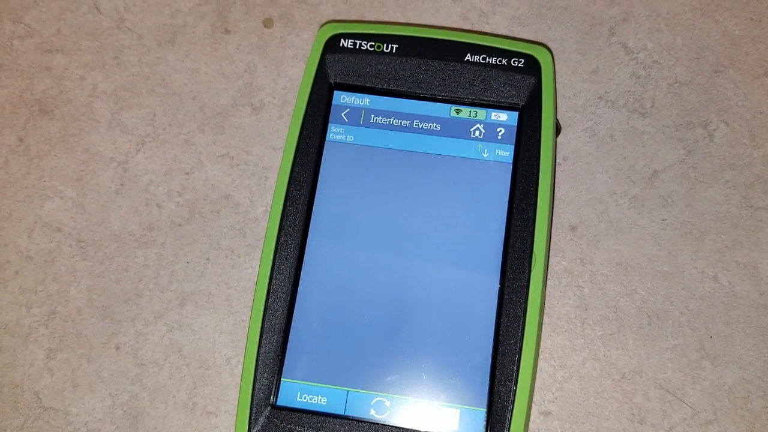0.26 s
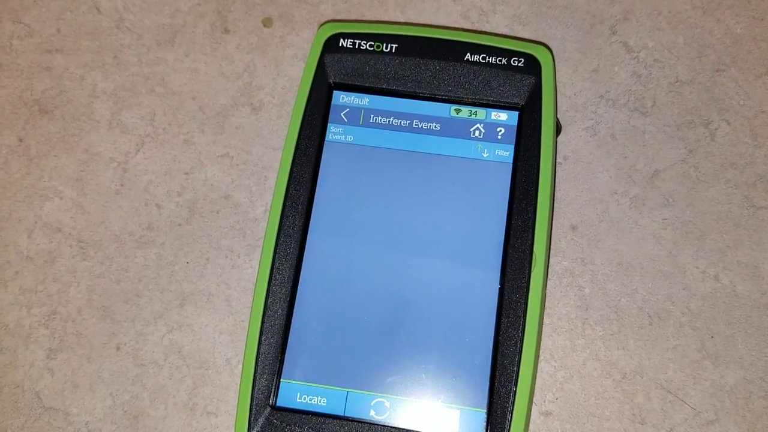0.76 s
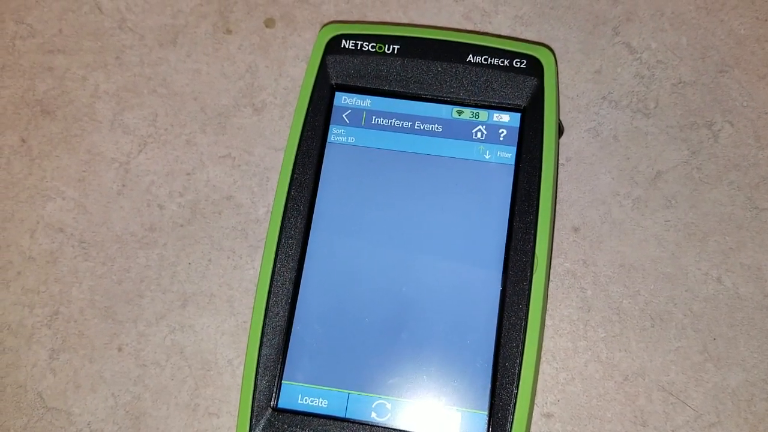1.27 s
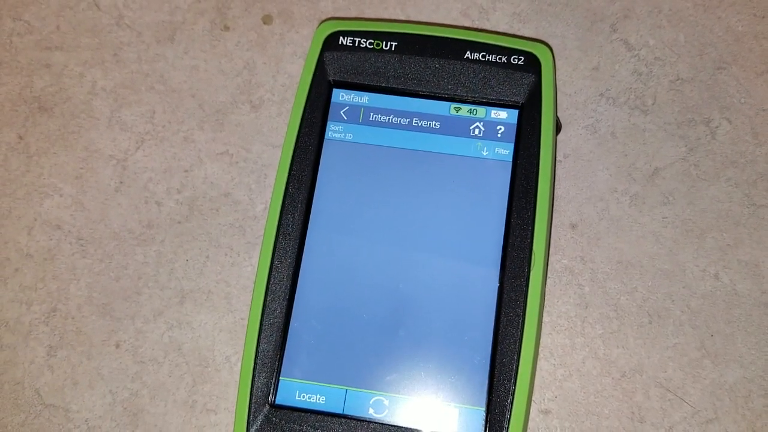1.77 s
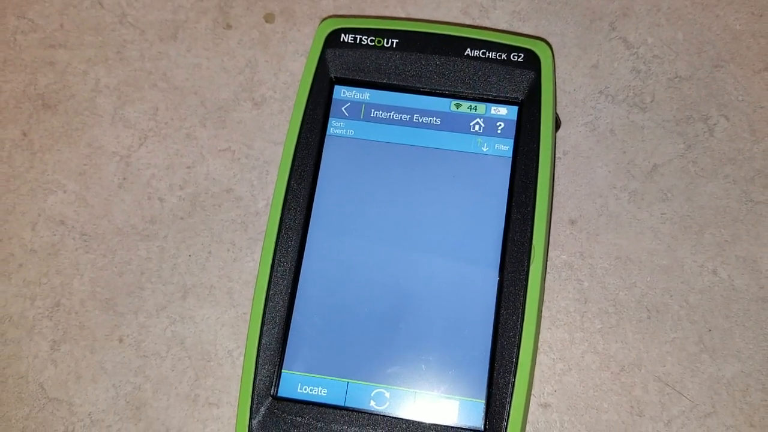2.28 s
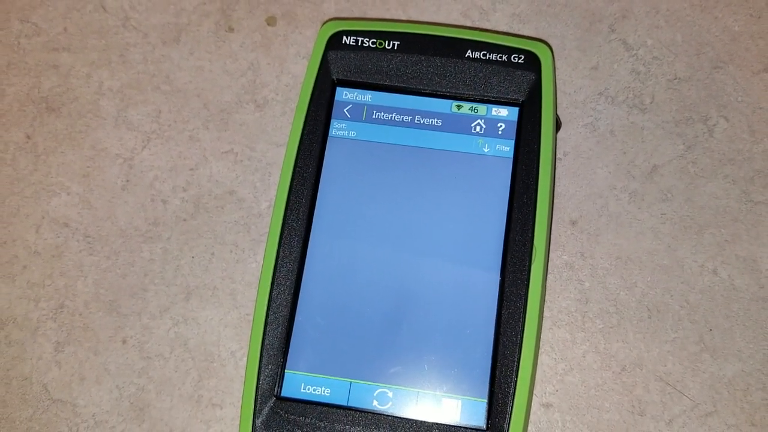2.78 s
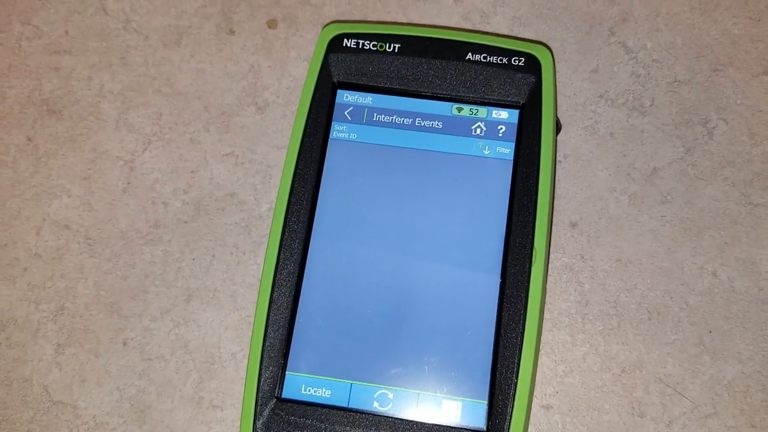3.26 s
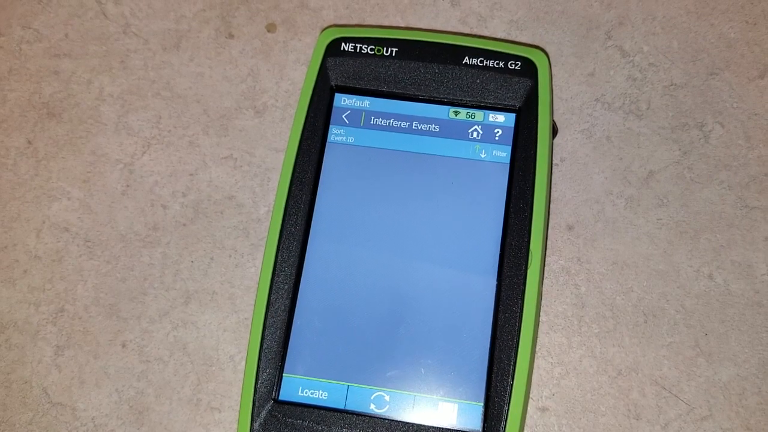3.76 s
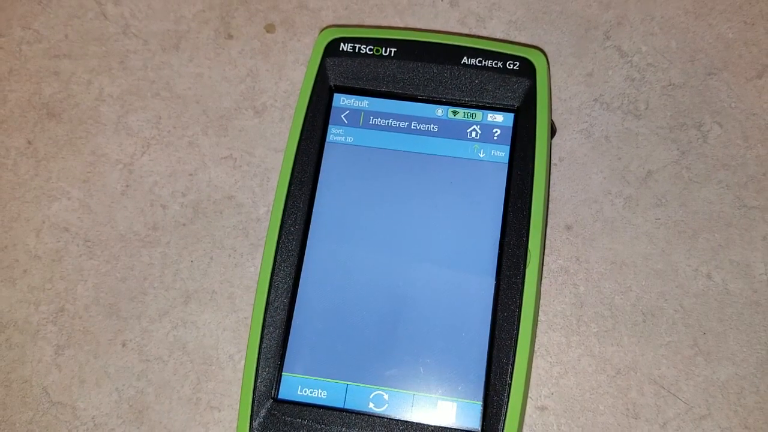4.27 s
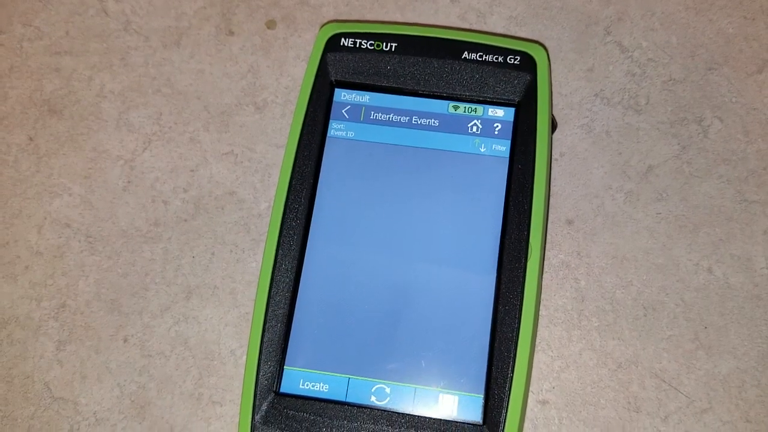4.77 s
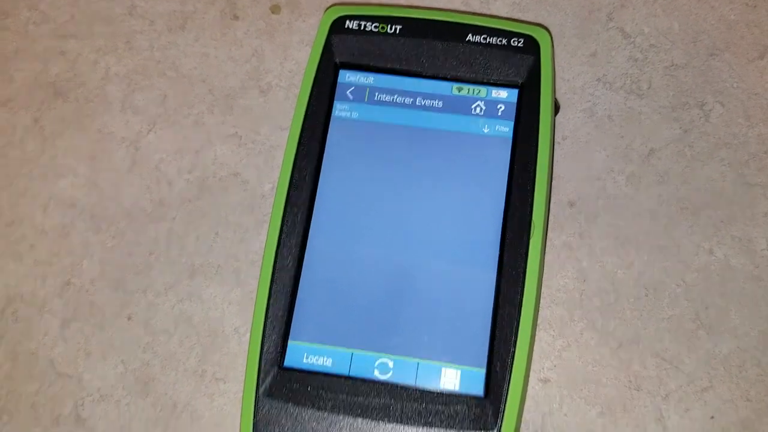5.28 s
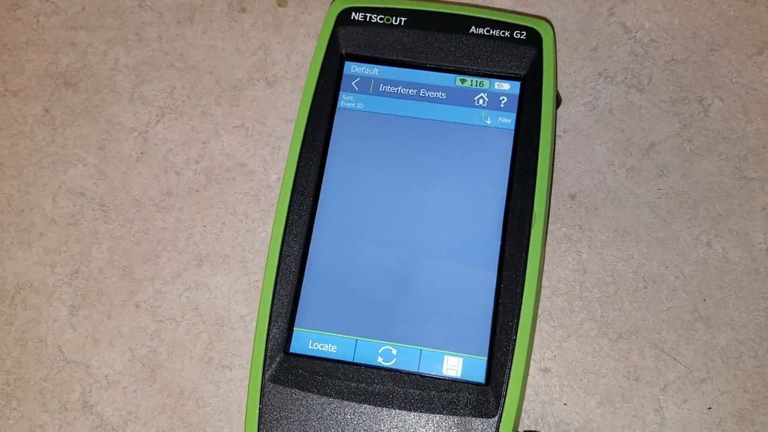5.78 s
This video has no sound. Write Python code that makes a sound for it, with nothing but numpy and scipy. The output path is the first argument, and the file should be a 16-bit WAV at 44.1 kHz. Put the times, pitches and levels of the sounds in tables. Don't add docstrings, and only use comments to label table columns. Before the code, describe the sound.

Two microwave ovens hum steadily together in a small hard room; near the end fingers tick on a plastic case, which snaps once sharply.

```python
import sys
import numpy as np
from scipy import signal
from scipy.fft import rfft, irfft, next_fast_len
from scipy.io import wavfile
from scipy.ndimage import uniform_filter1d

SR = 44100
rng = np.random.default_rng(int(sys.argv[2]) if len(sys.argv) > 2 else 0)


def convert_level_to_amplitude(level_db):
    exponent = np.asarray(level_db, float) / 20
    return 10 ** exponent


def pcm_store(signal):
    levels = np.round(np.clip(np.atleast_2d(signal), -1, 1) * 32767)
    wavfile.write(sys.argv[1], SR, levels.astype(np.int16).T)


N = 266275
TIME = np.arange(N) / SR


def along(table, hz):
    at, value = np.transpose(table)
    return np.interp(np.log(np.maximum(hz, 1)), np.log(at), value)


def sides(pan_db):
    gain = convert_level_to_amplitude(np.array([[pan_db], [-pan_db]]) / 2)
    return gain / np.sqrt(np.mean(gain ** 2))


def smooth(x, first, second):
    return uniform_filter1d(uniform_filter1d(x, first), second)


def walk(rate):
    hold = int(SR / rate)
    steps = np.repeat(rng.standard_normal(N // hold + 1), hold)
    return 1.3 * smooth(steps, hold, hold)[:N]


def band_pass(order, edges_hz):
    return signal.butter(order, edges_hz, "band", fs=SR, output="sos")


def decay(t, t60):
    return np.exp(-np.log(1000) * t / t60)


# frequency in Hz, level in dB per Hz.
AIR = [(20, -89.5), (40, -81.5), (70, -76.5), (100, -67.5), (170, -67), (215, -73.5), (250, -72),
       (300, -68), (350, -68.5), (385, -73.5), (480, -73.5), (560, -72.5), (700, -70), (900, -78.5)]
# frequency in Hz, level in dB per Hz.
HISS = [(900, -79), (1400, -81.5), (2200, -86), (3000, -89.5), (3900, -90.5), (5100, -97.5), (6500, -100.5),
        (7900, -103), (8600, -107.5), (10700, -106.5), (11400, -104.5), (12800, -105.5), (14200, -104.5),
        (15700, -106.5)]
# frequency in Hz, left minus right in dB.
SIDES = [(130, 0), (185, 2.5), (310, -2.5), (400, -2), (460, 2), (700, 2), (1200, -2), (4400, 0),
         (5800, -4.5), (7200, 0), (8600, 7), (12300, 1), (14200, 5), (14900, 16)]
# frequency in Hz, share common to both from 0 to 1.
ALIKE = [(25, .985), (60, .995), (200, 0.99), (400, 0.72), (750, 0.82), (1000, 0.26), (2000, 0.02),
         (6000, 0.03)]
# centre in Hz, width in Hz, height in dB (dips below zero).
VENTS = [(198, 14, 4), (222, 12, -4), (258, 12, -5), (272, 12, 4), (296, 10, 3), (350, 12, 4), (398, 14, 4),
         (418, 14, -3), (468, 18, 5), (492, 12, -5), (560, 10, -4), (720, 16, 3), (858, 30, 3),
         (1440, 120, 2), (1980, 150, 2)]
PORT_LAG_S = 0.00029
SHADE_FROM_S, SHADE_TO_S, SHADE_DB, COVER_S, UNCOVER_S = 5.29, 5.93, -4, .07, .02


def air():
    size = next_fast_len(N)
    hz = np.arange(size // 2 + 1) * SR / size
    common, left, right = rfft(rng.standard_normal((3, size)))
    alike = np.clip(along(ALIKE, hz), 0, 1)
    lag = np.exp(1j * np.pi * hz * PORT_LAG_S)
    ports = np.sqrt(alike) * common * np.array([lag, 1 / lag])
    ports += np.sqrt(1 - alike) * np.array([left, right])
    balance_db = np.outer([.5, -.5], along(SIDES, hz))
    ports *= np.sqrt(SR / 2) * convert_level_to_amplitude(along(AIR + HISS[1:], hz) + balance_db)
    ports *= convert_level_to_amplitude(sum(db / (1 + (2 * (hz - at) / width) ** 2) for at, width, db in VENTS))
    ripple = smooth(rng.standard_normal(ports.shape), 400, 200)
    ports *= convert_level_to_amplitude(45.0 * np.minimum(hz / 1500, 1) * ripple)

    out, swell, octave = 0, walk(0.81), np.log2(np.maximum(hz, 1))
    for centre in np.arange(4, 15):
        band = np.cos(np.pi / 2 * np.clip(octave - centre, -1, 1)) ** 2
        level = convert_level_to_amplitude(0.15 * swell + 0.27 * walk(5.1))
        out = out + level * irfft(ports * band, size)[:, :N]

    covering = (TIME - SHADE_FROM_S) / COVER_S
    uncovering = (SHADE_TO_S - TIME) / UNCOVER_S
    shade = SHADE_DB * np.clip(np.minimum(covering, uncovering), 0, 1)
    treble = signal.sosfiltfilt(band_pass(3, [7800, 13200]), out)
    return out + (convert_level_to_amplitude(shade) - 1) * treble


ROOM_DB, ROOM_T60_S = -17, 0.08


def room(x):
    t = TIME[:6000]
    walls = rng.standard_normal((2, len(t))) * decay(t, ROOM_T60_S) * (t > .002)
    tail = signal.fftconvolve(x.mean(axis=0)[None], walls, axes=1)[:, :N]
    return x + convert_level_to_amplitude(ROOM_DB) * tail / 10


def tick(s, hz, width_hz, db, pan_db, ring):
    out, t = np.zeros((2, N)), TIME[:600]
    noise = rng.standard_normal((2, len(t)))
    edges = np.clip([hz - width_hz / 2, hz + width_hz / 2], 900, .45 * SR)
    release = 9 * (t == 0)
    burst = (noise[0] + .8 * noise + release) * decay(t, ring)
    burst = signal.sosfilt(band_pass(3, edges), burst)
    start = int(s * SR)
    out[:, start:start + len(t)] = convert_level_to_amplitude(db) * sides(pan_db) * burst / np.abs(burst).max()
    return out


BODY_WIDTH = 0.72
SHELL_HZ, SHELL_WIDTH_HZ, EDGE_HZ, EDGE_WIDTH_HZ = 6500, 4400, 12200, 8400


def hand(table, pan_db, ring):
    out = 0
    for s, hz, body_db, shell_db, edge_db in table:
        out = out + tick(s, hz, BODY_WIDTH * hz, body_db, pan_db, ring)
        out = out + tick(s, SHELL_HZ, SHELL_WIDTH_HZ, shell_db, pan_db, ring)
        out = out + tick(s, EDGE_HZ, EDGE_WIDTH_HZ, edge_db, pan_db, ring)
    return out


# start in seconds, body pitch in Hz, body, shell and edge levels in dB.
LEFT_TICKS = [
    (5.1998, 1750, -25, -30.5, -37),
    (5.229, 3500, -30, -34, -34),
    (5.2592, 2900, -30, -25.5, -30),
    (5.2823, 1700, -34, -37, -55),
]
# start in seconds, peak level in dB, centre in Hz.
CRACKLE = [
    (5.218, -48, 7000),
    (5.2215, -44, 7500),
    (5.238, -42, 6500),
    (5.2405, -43, 13000),
    (5.247, -45, 13000),
    (5.2545, -44, 8000),
    (5.2555, -43, 13000),
    (5.2572, -43, 13000),
    (5.267, -48, 12000),
]
LEFT_PAN_DB, LEFT_RING_S, CRACKLE_WIDTH_HZ = 25, 0.0033, 3700


def left_hand():
    out = hand(LEFT_TICKS, LEFT_PAN_DB, LEFT_RING_S)
    for s, db, hz in CRACKLE:
        out = out + tick(s, hz, CRACKLE_WIDTH_HZ, db, LEFT_PAN_DB, LEFT_RING_S)
    return out


# start in seconds, body pitch in Hz, body, shell and edge levels in dB.
RIGHT_TICKS = [
    (5.9312, 3500, -31.5, -30, -36),
    (5.9454, 4670, -22, -29, -34),
    (5.966, 9000, -60, -60, -44),
]
RIGHT_PAN_DB, RIGHT_RING_S = -8.5, 0.0046


def right_hand():
    return hand(RIGHT_TICKS, RIGHT_PAN_DB, RIGHT_RING_S)


KNOCK_S, KNOCK_HZ, KNOCK_WIDTH_HZ, KNOCK_DB, KNOCK_RING_S, KNOCK_EDGE_DB = 6.0014, 3600, 2000, -21, 0.016, -42


def knock():
    hollow = tick(KNOCK_S, KNOCK_HZ, KNOCK_WIDTH_HZ, KNOCK_DB, RIGHT_PAN_DB, KNOCK_RING_S)
    return hollow + tick(KNOCK_S, EDGE_HZ, EDGE_WIDTH_HZ, KNOCK_EDGE_DB, RIGHT_PAN_DB, KNOCK_RING_S)


# start in seconds, strength in dB, length of push in seconds.
SNAP = [
    (5.9925, -30, .0006),
    (5.9953, -23, .0006),
    (5.9977, -27, .0015),
    (5.9995, -18, .0008),
    (6.0007, -19, 0.00043),
    (6.002, -4.5, 0.00093),
    (6.005, -20, .001),
    (6.0072, -27, 0.0012),
    (6.0095, -24, .0008),
]
# frequency in Hz, level in dB, 60 dB decay time in seconds.
SNAP_MODES = [
    (3050, -11.5, 0.013),
    (3700, -19, 0.0088),
    (4420, -11.5, 0.008),
    (5790, -1, 0.0064),
    (6160, -25, 0.029),
    (6900, -10, .006),
]
SNAP_DB, SNAP_PAN_DB = -12, -13


def snap():
    force, t = np.zeros(N), TIME[:200]
    main_mode = np.sin(2 * np.pi * SNAP_MODES[3][0] * t)
    for s, db, push in SNAP:
        shape = np.sin(np.pi * np.clip(t / push, 0, 1))
        rough = main_mode + .7 * rng.standard_normal(len(t))
        start = int(s * SR)
        force[start:start + len(t)] += convert_level_to_amplitude(db) * shape * rough
    t = TIME[:4000]
    body = sum(convert_level_to_amplitude(db) * np.sin(2 * np.pi * hz * t) * decay(t, t60) for hz, db, t60 in SNAP_MODES)
    ring = signal.fftconvolve(force, body)[:N]
    ring = signal.sosfilt(band_pass(8, [2500, 7400]), ring)
    ring *= convert_level_to_amplitude(SNAP_DB) / np.abs(ring).max()
    return sides(SNAP_PAN_DB) * ring


def tones(table, turns, waver_db, wander):
    out = np.zeros((2, N))
    for multiple, db, pan_db, lead in table:
        phase = 2 * np.pi * (multiple * turns + rng.random()) + wander * walk(3.07)
        size = np.sqrt(2) * convert_level_to_amplitude(db + waver_db * walk(4.95))
        wave = np.sin(phase + np.array([[lead], [-lead]]) / 2)
        out += size * sides(np.clip(pan_db, -14, 14)) * wave
    return out


# frequency in Hz, level in dB, left minus right in dB, left lead in radians.
DRONES = [(158.5, -55.1, -0.7, 0.32), (196.8, -59.8, 1.1, 0.25), (269.2, -62.1, 2.0, 0.22),
          (402.7, -61.0, -15.8, 0.03), (522.7, -60.6, -2.9, 0.01), (546.4, -56.7, 1.0, -1.24),
          (619.0, -57.3, -5.3, -0.03), (642.7, -63.2, -29.8, -1.06), (666.4, -49.9, 8.7, 0.2),
          (235.2, -57, -1, 1), (331.4, -51, -0.88, -0.21)]


def motors():
    return tones(DRONES, TIME, waver_db=1.3, wander=.45)


# multiple of shaft speed, level in dB, left minus right in dB, left lead in radians.
BLOWER = [(1, -68.7, 0.1, 0.01), (3, -58.8, 1.3, 0.02), (6, -36.4, -0.1, 0.28), (9, -62.8, -5.4, 0.7),
          (12, -51.4, -5.0, 0.58), (18, -61.9, 6.8, 1.24), (24, -63.8, 2.1, -0.23), (30, -60.7, 0.9, 1.81),
          (36, -68.8, 7.1, 2.81)]
# multiple of shaft speed, level in dB, left minus right in dB, left lead in radians.
COOLER = [(1, -75, 13, 6), (2, -53, 0, 0.33), (4, -58.5, -5, -3), (6, -49, 0, 0.82), (12, -66.5, -19, 0.5)]
# time in seconds, blower speed in Hz, cooler speed in Hz.
SHAFTS = [
    (0, 25.64, 47.5),
    (3.6, 25.61, 47.5),
    (4.2, 25.67, 47.5),
    (6.04, 25.68, 47.5),
]


def fans():
    s, *speeds = np.transpose(SHAFTS)
    blower, cooler = (np.cumsum(np.interp(TIME, s, hz)) / SR for hz in speeds)
    out = tones(BLOWER, blower, waver_db=.6, wander=.1)
    return out + tones(COOLER, cooler, waver_db=1.6, wander=.55)


MAINS_HZ = 60.04
# frequency in Hz, level in dB per mains line.
RATTLE = [(3000, -99), (4000, -99), (5400, -104), (6400, -84.5), (7300, -103), (8400, -99.5), (9600, -99.5),
          (10200, -107), (12400, -104), (14000, -108)]


def rattle():
    size = 4096
    hz = MAINS_HZ * np.arange(size // 2 + 1)
    shared_db = 5.5 * rng.standard_normal(len(hz))
    own_db = 2.5 * rng.standard_normal((2, len(hz)))
    lines = convert_level_to_amplitude(along(RATTLE, hz) + shared_db + own_db)
    lines = lines * (hz > RATTLE[0][0]) * (hz < RATTLE[-1][0])
    lines = lines * convert_level_to_amplitude(np.outer([1, -1], 0.93 * along(SIDES, hz)))
    cycle = irfft(lines * np.exp(2j * np.pi * rng.random(lines.shape))) * size / np.sqrt(2)
    place = (MAINS_HZ * TIME % 1) * size
    return np.array([np.interp(place, np.arange(size), c, period=size) for c in cycle])


# multiple of the mains, level in dB, left minus right in dB, left lead in radians.
TRANSFORMER = [(2, -40.8, -0.5, 0.01), (3, -51.4, 4.2, 0.42), (4, -49.2, -0.3, 1.13),
               (6, -58.2, -4.8, 0.72), (16, -69.6, -4.7, -1.38), (20, -72.0, -5.2, 3.03)]


def transformers():
    return tones(TRANSFORMER, MAINS_HZ * TIME, waver_db=.6, wander=.04)


LEFT_ROOM_SHARE = .3


def scene():
    ovens = transformers() + fans() + motors() + rattle() + air()
    left = left_hand()
    right = right_hand() + knock() + snap()
    return ovens + (1 - LEFT_ROOM_SHARE) * left + room(LEFT_ROOM_SHARE * left + right)


def top_cut(x):
    return signal.sosfilt(signal.butter(12, 16900, fs=SR, output="sos"), x)


TOP_HZ = 15730


def record(dry):
    size = next_fast_len(N)
    hz = np.arange(size // 2 + 1) * SR / size
    cut = irfft(rfft(dry, size) * (hz < TOP_HZ), size)[:, :N]
    return top_cut(cut)


dry = scene()
out = record(dry)
pcm_store(out)
```